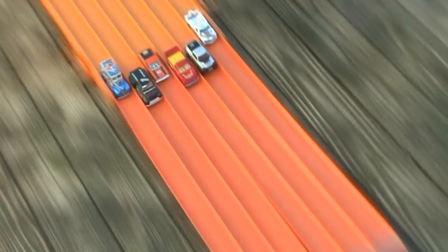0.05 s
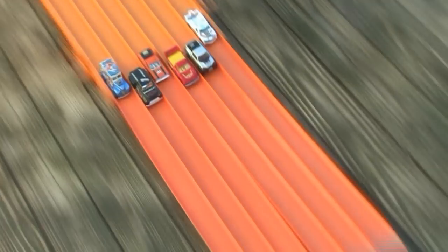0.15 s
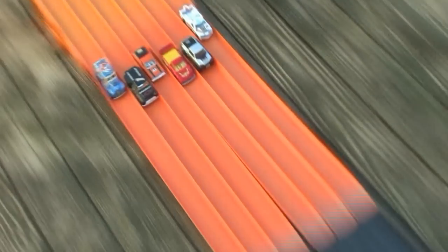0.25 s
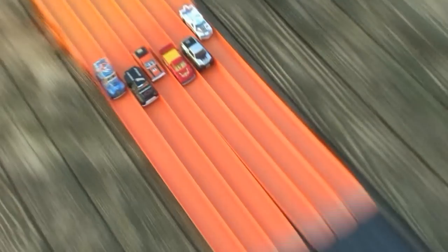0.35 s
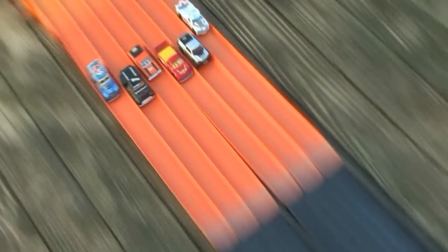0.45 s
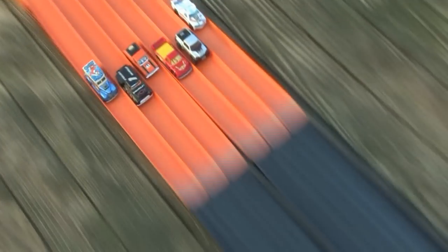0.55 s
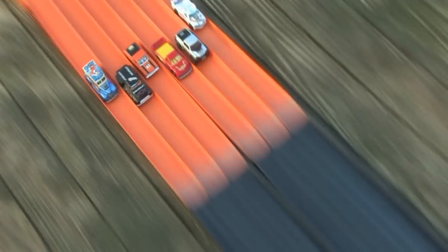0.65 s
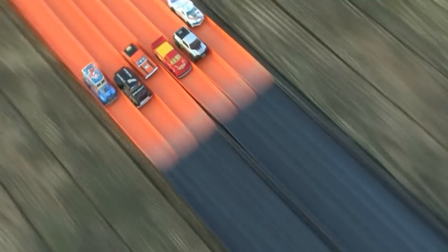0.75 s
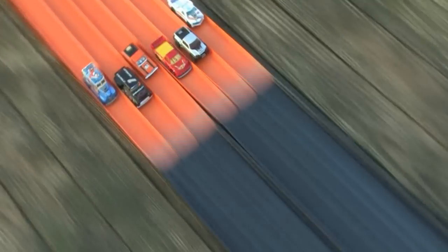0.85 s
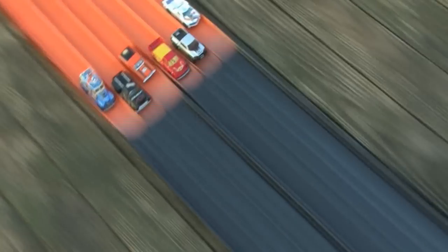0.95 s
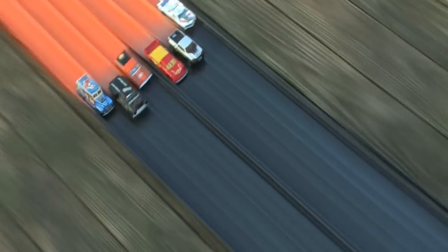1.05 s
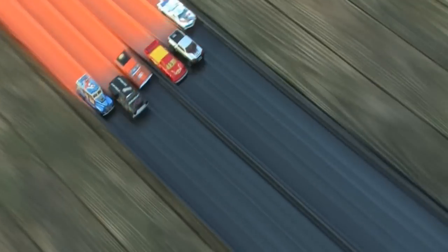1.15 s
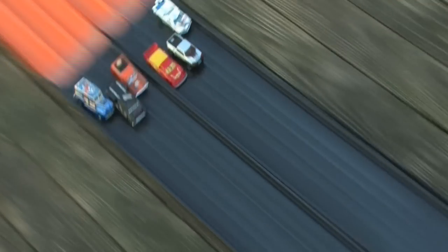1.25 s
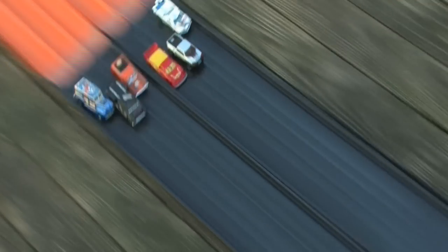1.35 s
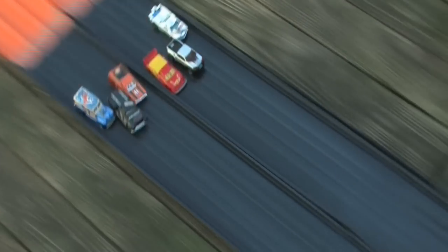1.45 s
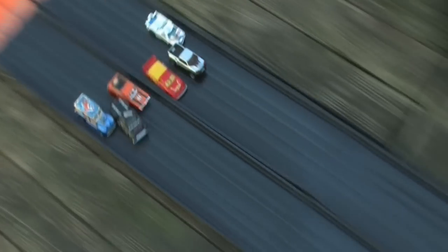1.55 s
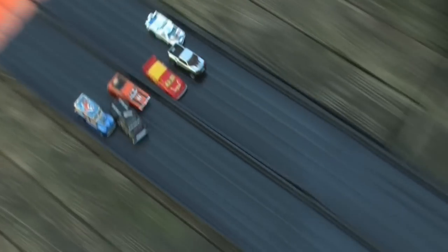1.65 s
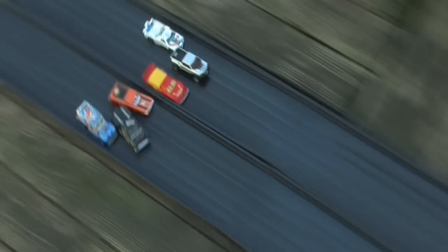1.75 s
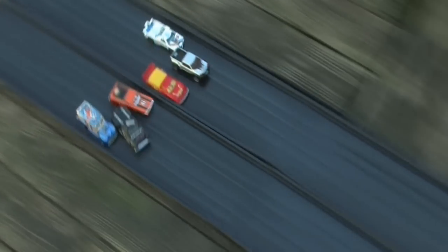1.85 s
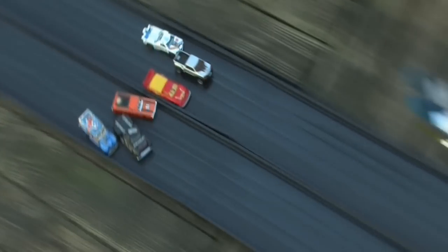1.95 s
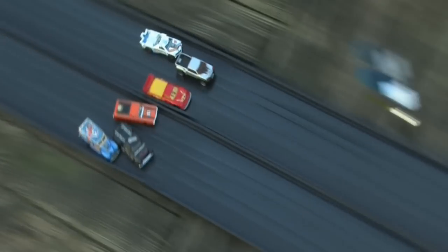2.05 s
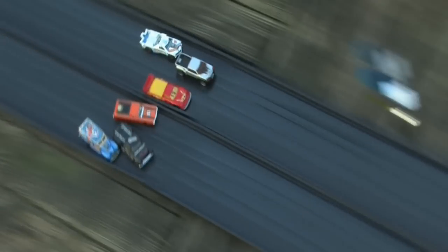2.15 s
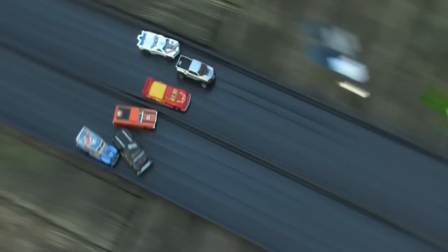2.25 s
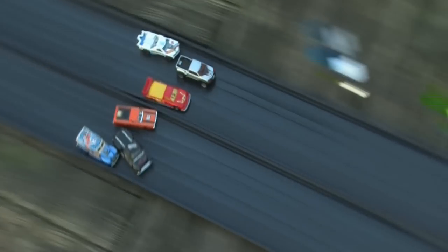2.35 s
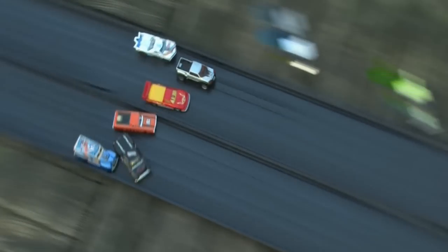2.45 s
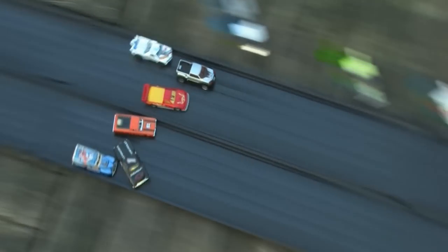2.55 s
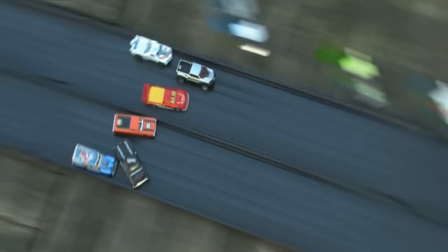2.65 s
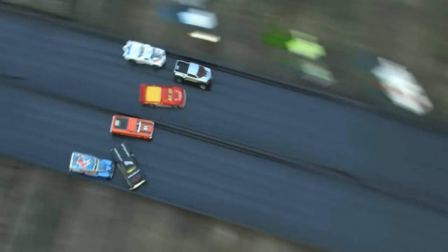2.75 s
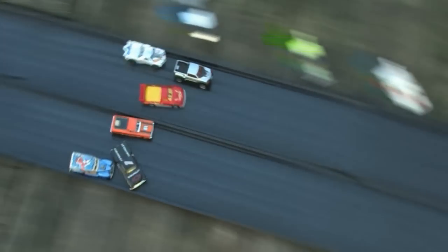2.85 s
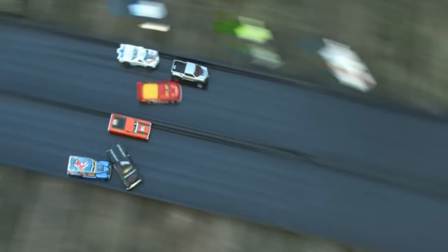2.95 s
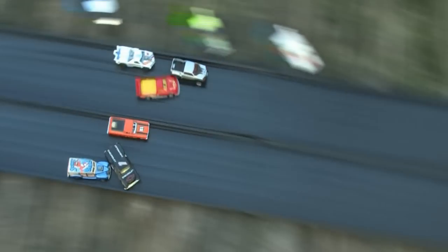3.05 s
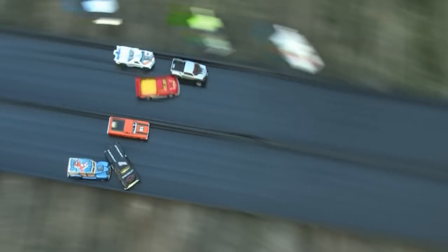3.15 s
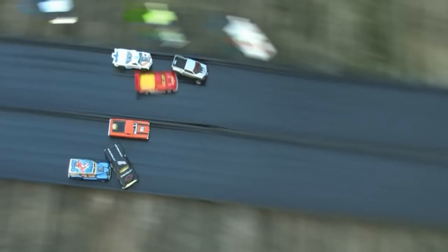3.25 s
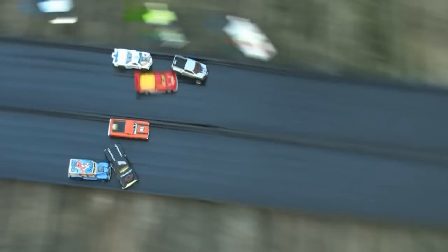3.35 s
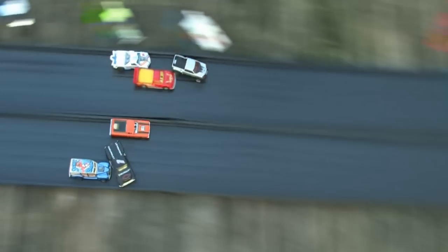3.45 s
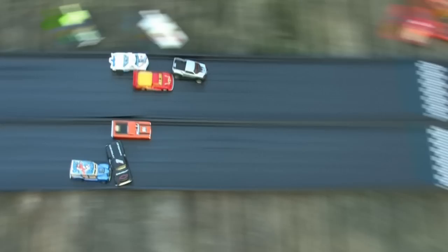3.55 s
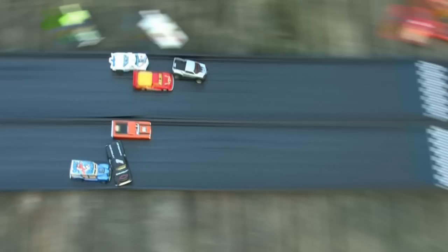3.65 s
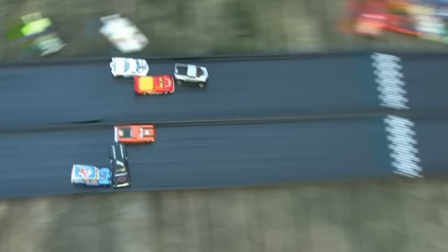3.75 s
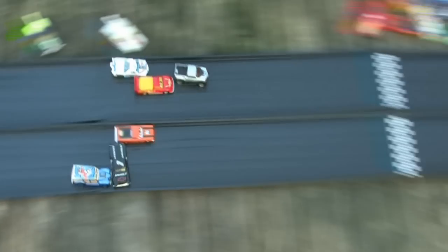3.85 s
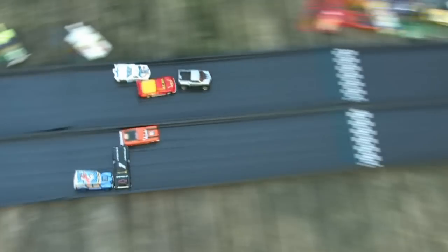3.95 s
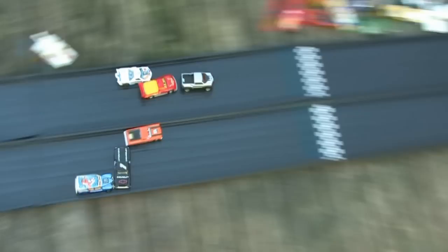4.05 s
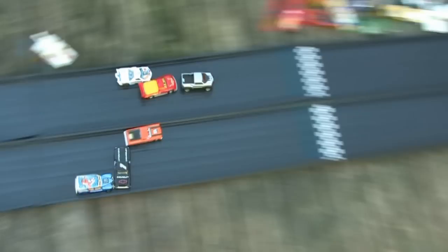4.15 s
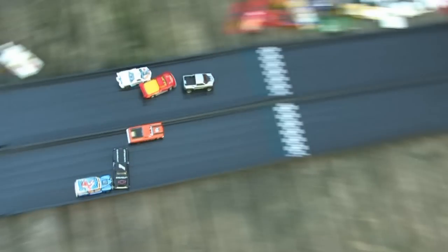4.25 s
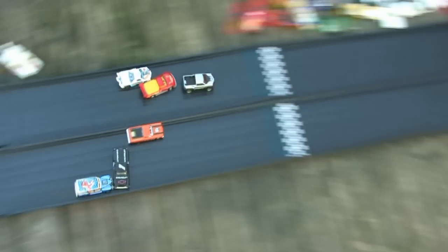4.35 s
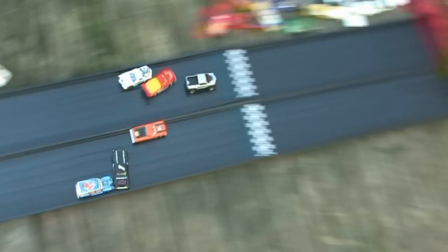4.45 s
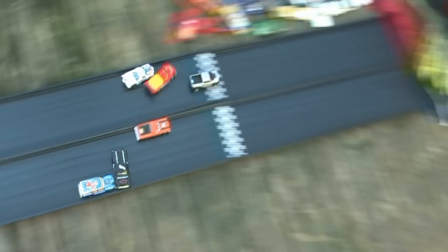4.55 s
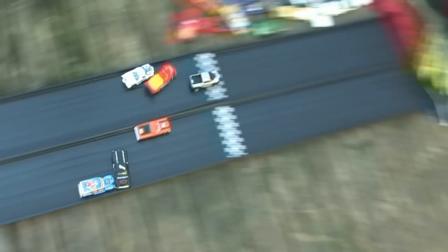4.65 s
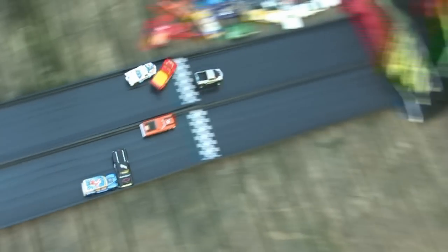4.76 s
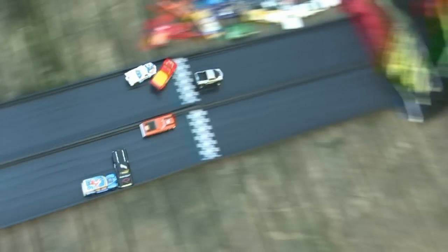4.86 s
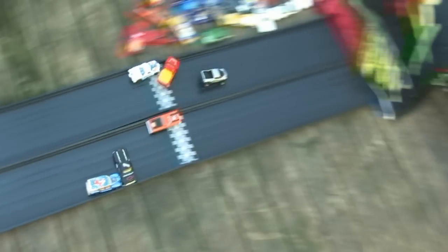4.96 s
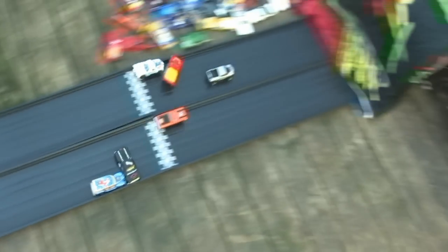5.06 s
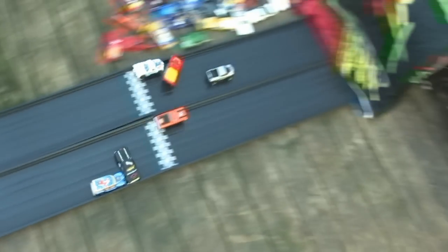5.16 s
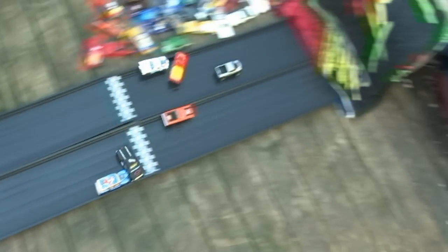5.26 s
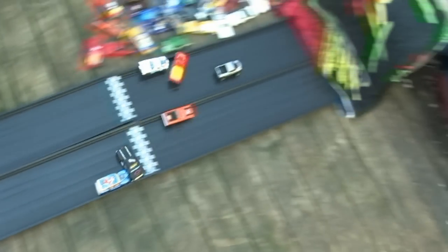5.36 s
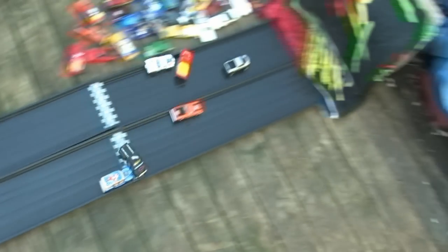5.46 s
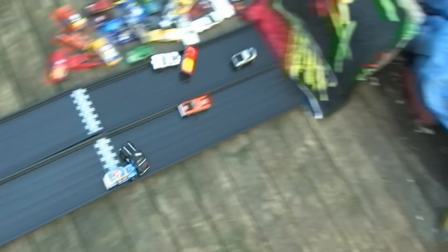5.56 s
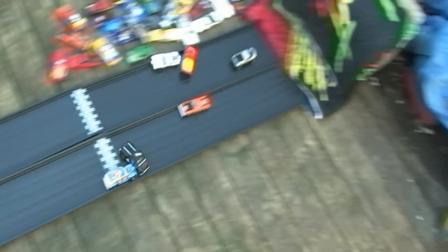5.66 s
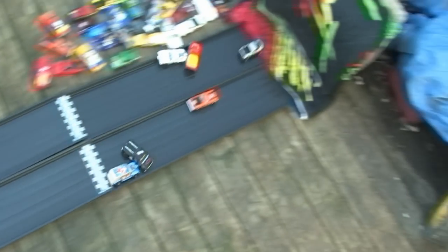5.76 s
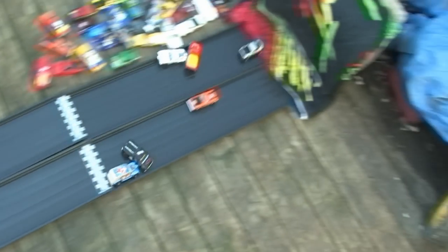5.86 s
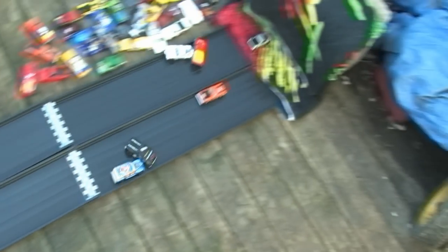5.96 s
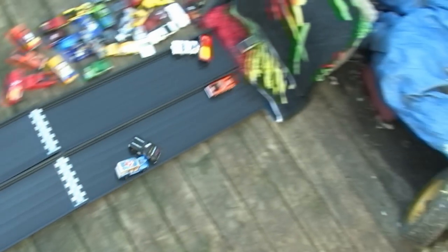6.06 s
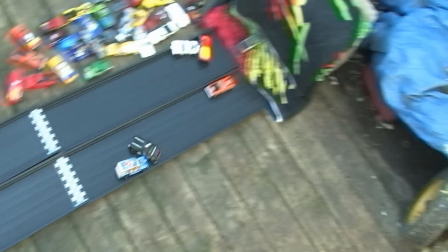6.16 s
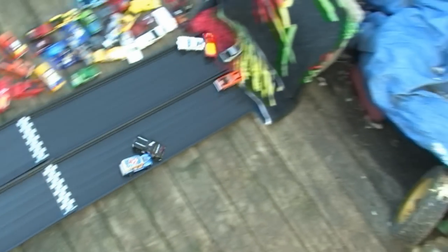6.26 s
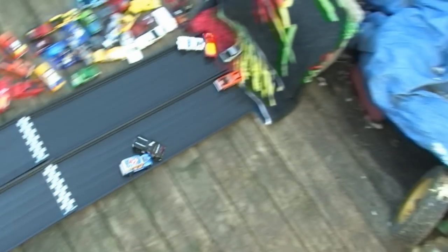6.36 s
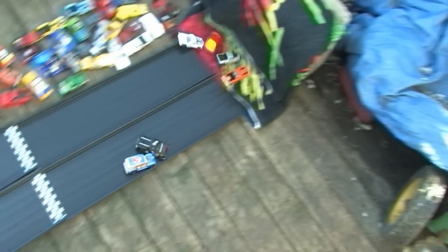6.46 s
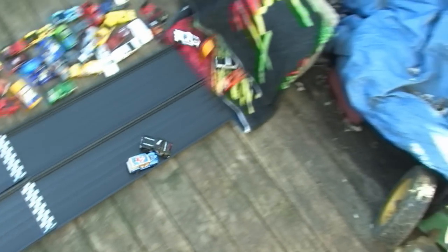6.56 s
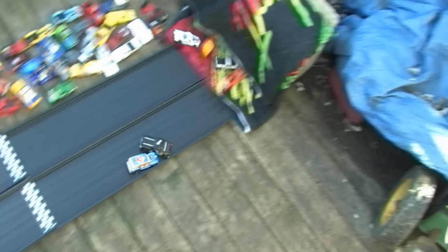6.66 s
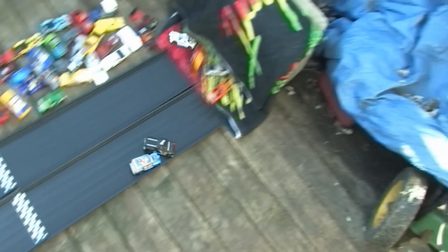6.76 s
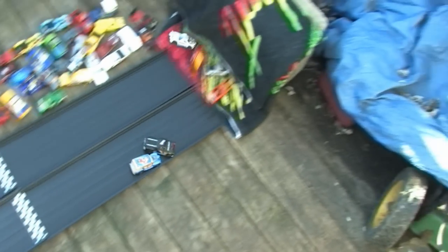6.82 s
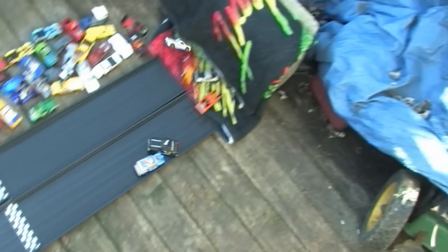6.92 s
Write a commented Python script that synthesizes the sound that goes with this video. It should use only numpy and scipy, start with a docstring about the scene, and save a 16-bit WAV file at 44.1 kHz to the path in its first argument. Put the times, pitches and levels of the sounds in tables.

```python
"""A drumming, rattling rush of small die-cast toy cars on a plastic track, close up in slow motion.
The cars clack, thump and ring as they hop over a joint, jostle and drop into a catch bag.
Random wheel bumps pass through resonances of the track and the cars to make the rolling;
short random pushes make the clacks and thumps, and fading sine notes the rings and ticks.
Below lies a rumble of shaped noise; slow playback adds a faint mirrored fizz in the treble."""
import sys
import numpy as np
from scipy import signal
from scipy.fft import rfft, irfft
from scipy.io import wavfile
from scipy.ndimage import uniform_filter1d, minimum_filter1d, map_coordinates

SR = 44100
rng = np.random.default_rng(int(sys.argv[2]) if len(sys.argv) > 2 else 0)


def waveform_to_disk(signal):
    """Save audio, clipped to [-1, 1], as 16-bit WAV at the path in sys.argv[1]."""
    frames = np.transpose(np.atleast_2d(signal))
    scaled = np.clip(frames, -1, 1) * 32767
    samples = np.round(scaled).astype(np.int16)
    wavfile.write(sys.argv[1], SR, samples)


N = 308259
TIME = np.arange(N) / SR  # seconds
BINS = np.fft.rfftfreq(N, 1 / SR)  # Hz

# Levels in the tables are relative: the functions below scale them further.
# Low stir of the open air. Each row: frequency in Hz, strength in dB.
AIR = [(5, -20), (22, -1.5), (45, -3), (80, -8), (130, -45), (300, 6.5), (1000, -53), (4000, -64.5)]
# Soft puffs in the air. Each row: time in seconds, extra level in dB.
PUFFS = [(1.36, 15), (5.45, 7.7), (6.33, 10)]
BREEZE_DB, PUFF_S = -43, 0.025

# Resonances of the parts. Each row: frequency in Hz, width in Hz, strength in dB.
SHEET = [(209.6, 63.7, 0.5), (284.5, 28, -3.5)]
DECK = [(317, 40, -9.5), (412, 290, 1.5), (478.5, 96, 1.5)]
RAILS = [(673, 144, 2), (770, 142, 5.9), (862, 101, 7.5), (934.5, 117, 3.8)]
CARS = [(835, 190, -10.5), (980, 130, -15.5), (1214, 645, -0.5), (1340, 107, 6.5), (1475, 190, 3),
        (1722, 120, 1.5), (1820, 120, 0.5)]
# Axles in their slots, with the same columns: frequency in Hz, width in Hz, strength in dB.
AXLES = [(2197, 380, 0.5), (2200, 250, -4.5), (2592, 270, 1.5), (2898, 180, -1.5), (3490, 152, -5),
         (3950, 210, -13.5)]
# A body buzzing on its chassis, with the same columns: frequency in Hz, width in Hz, strength in dB.
BUZZ = [(1587, 87, 0.5), (1640, 110, -2.5)]

# Loose lengths of track that drone hollowly. Each row: start in seconds, end in seconds,
# first pitch in Hz, last pitch in Hz, width in Hz, level in dB.
SPANS = [(0.578, 1.133, 366, 467, 176, -23.5), (1.2, 2.01, 417, 408, 68.5, -27),
         (1.53, 1.807, 255, 218, 70, -24.5), (1.95, 2.384, 262, 357, 111, -26),
         (2.265, 2.404, 416, 390, 51, -26), (2.852, 3.724, 502, 469, 56, -28),
         (2.846, 3.598, 196, 262, 54.4, -26), (3.895, 4.363, 445, 370, 70, -27),
         (4.202, 4.537, 213, 190, 39.6, -27.5), (4.577, 5.2, 412, 390, 45.6, -28.5)]
SPAN_FADE_S = 0.12

# How hard the pack rolls; it thins out as cars stall or drop into the bag.
# Each row: time in seconds, level in dB.
ROLL = [(0, -19.5), (.07, -17), (.7, -21.5), (1.7, -20.5), (2.38, -19.5), (2.6, -21), (2.9, -20),
        (4.7, -21), (5.68, -21.5), (5.82, -24.5), (6.5, -24), (6.66, -28), (6.99, -34.5)]
# How freely the track sheet flexes under the cars. Each row: time in seconds, level in dB.
FLEX = [(0, -37), (.35, -27), (1.12, -47), (1.28, -24.5), (1.48, -41), (1.58, -29.5), (2.35, -28.5),
        (3.15, -25), (3.6, -26.5), (4.0, -27), (4.4, -26.5), (5.1, -27.5), (5.65, -24), (5.85, -32),
        (6.4, -32.5), (6.99, -36)]
# Harder rattling, from rough track or rubbing cars. Each row: start in seconds, end in seconds,
# extra level in dB.
RATTLES = [(0, 0.31, 9.5), (1.096, 1.41, 1), (2.274, 2.42, 2.5), (4.824, 4.912, 4), (6.885, 6.99, 1.5)]
RATTLE_UNDER_DB, RATTLE_RISE_S, RATTLE_FALL_S = -12, 0.13, 0.19
# Brief level changes, mostly lulls as the wheels run smoothly or leave the track.
# Each row: time in seconds, change of the rolling in dB, change of the rattle in dB.
LULLS = [(0.121, -1.5, -8.5), (.158, 4, -4.5), (3.02, -0.5, -1), (.54, -2, -3.5), (1.485, -6.5, 1),
         (1.94, -3.5, -1), (2.215, -7.5, 3.5), (2.6, -7, 0), (3.943, -6.5, -5), (4.979, -2.5, -5),
         (5.24, -6.5, -3.5), (5.348, -8, -8), (5.44, -8.5, 1.5), (5.79, 1.5, -7.5)]
LULL_S = 0.022
# The load on the wheels surges at random: rough top speed, then typical (rms) depths.
SURGE_HZ, FLEX_SURGE_DB, ROLL_SURGE_DB, RATTLE_SURGE_DB = 10.9, 4.5, 1.5, 2.5
# The track's resonances wander as the cars move: typical depth as a share of the pitch, and speed.
SHEET_DRIFT, DECK_DRIFT, DRIFT_HZ = 0.05, 0.04, 4.97
AXLE_FADE_DB_PER_S = 0.5  # the axles tick less as the cars lose speed
CLUMP_HZ, CLUMP_DB = 22.06, 5  # the ticks bunch and thin out: speed, typical depth

# Cars dropping back on their wheels. Each row: time in seconds, level in dB,
# settling time in seconds, dead thud over the boom in dB.
THUMPS = [(1.324, -11.5, 0.013, -6), (1.519, -11, 0.0062, -20), (1.575, -21, .012, -9),
          (1.745, -17, 0.0082, -9), (1.98, -12.5, 0.011, -14), (2.05, -18, 0.019, -14),
          (3.209, -18, 0.007, -5), (3.232, -12.5, 0.0072, -22), (3.315, -11, 0.0059, -3),
          (3.689, -15.5, 0.0028, -18), (4.517, -14.5, 0.0055, -5), (5.158, -13.5, 0.009, -22),
          (5.177, -15.5, 0.0057, -21), (5.292, -12, 0.002, 1.5), (5.477, -14, 0.0072, -13),
          (5.588, -15.5, 0.0049, -19), (5.622, -13, 0.012, -13), (5.848, -19.5, 0.0092, -8),
          (6.493, -21, 0.0076, -13), (6.512, -21.5, 0.011, -18)]
# Knocks that leave one car ringing on a clear note. Each row: time in seconds, pitch in Hz,
# level in dB, time to fall by 60 dB in seconds.
RINGS = [(0.086, 1495, -14, 0.089), (1.312, 1387, -3, 0.045), (1.313, 1817, -1, 0.045),
         (1.315, 2590, -22, 0.039), (1.314, 3970, -12, 0.016), (1.387, 2450, -24, 0.034),
         (1.317, 787, -8, 0.047), (2.157, 1780, -18.5, 0.056), (2.494, 1470, -9.5, 0.041),
         (2.729, 1510, -15, 0.053), (2.798, 1300, -16, 0.052), (3.685, 930, -7.5, 0.078),
         (3.969, 876, -6, 0.042), (4.161, 1826, -26, .06), (4.345, 1820, -22.5, 0.083),
         (4.862, 868, -8.5, 0.12), (4.921, 1335, -22, 0.092), (5.377, 1350, -11.5, 0.049),
         (5.379, 1210, -15, 0.052), (5.381, 770, -14, 0.045), (5.394, 1800, -18, 0.041),
         (6.571, 855, -4, 0.043), (6.576, 2500, -23, 0.026), (6.577, 524, -9.5, 0.05),
         (6.585, 818, -1, 0.03), (6.596, 1885, -15, 0.04), (6.612, 1410, -12, 0.024),
         (6.755, 1453, -17, 0.044), (6.758, 770, -10, 0.03), (6.754, 1740, -19, 0.045)]
# Cars striking joints, walls and each other. Each row: time in seconds, level in dB,
# contact length in seconds, bright crack over the body in dB, knock of the deck over the body in dB.
CLACKS = [(0.047, -29, 0.0024, -2, 2), (0.075, -18.5, 0.0024, -29, -2), (0.226, -20, 0.0037, -26, 7),
          (0.271, -15, 0.0041, -21, -5), (0.298, -23, 0.0062, -22, -2), (1.224, -31.5, 0.016, -16, 4),
          (1.312, -15.5, 0.0061, -4, 2.5), (1.383, -29.5, 0.0063, -7, 10), (2.159, -34, 0.0013, -2, 16),
          (2.492, -22.5, 0.0033, -7, -11), (2.56, -29.5, 0.0025, -5.5, -7), (2.734, -26, 0.0025, -11.5, -9),
          (2.796, -31.5, 0.0024, -5, -4), (3.313, -33, 0.0078, -6, 6), (3.603, -32, 0.015, -7, 4.5),
          (3.682, -24.5, 0.008, -7, -7), (3.746, -39, 0.0026, 7, -13), (5.161, -28.5, 0.021, -10, -10),
          (5.204, -28, 0.0027, -17, 7), (5.377, -20, 0.0014, -11, -15), (5.394, -29, 0.0017, -12, -8),
          (5.421, -31, .004, -21, -3), (5.503, -32.5, 0.0032, 1, 7), (5.585, -28.5, 0.0049, -7, 3.5),
          (5.614, -30.5, 0.017, -13, -0.5), (5.69, -31.5, 0.0033, -13, 16), (6.122, -34.5, 0.013, -9, -1),
          (6.493, -25, 0.005, -15, 7.5), (6.575, -23, 0.014, -5.5, -3.5), (6.612, -31, 0.002, -7, -4),
          (6.699, -34.5, 0.0071, -25, -8), (6.752, -27, 0.0022, -5.5, -1), (6.762, -26, .0015, -12, -2.5)]
# Short extra clacks. Each row: time in seconds, level in dB.
NUDGES = [(0.256, -32), (1.562, -38), (2.06, -29.5), (2.144, -40), (4.552, -31.5), (5.292, -32.5),
          (5.368, -35), (5.931, -34.5)]
NUDGE_S, NUDGE_CRACK_DB = 0.0016, -5
CAR_SPREAD = 0.04  # largest shift of a car's pitch, as a share

# How alike left and right are. Each row: frequency in Hz, likeness from 0 to 1.
SAME = [(50, .93), (180, .98), (350, .96), (700, .89), (1400, .8), (2800, .72)]
# How much louder left is than right. Each row: frequency in Hz, difference in dB.
BALANCE = [(50, 1.1), (350, 3.57), (700, 1.5), (1400, 1.2), (2800, 0.46)]
# Slow playback: samples a second, top of the slowed sound, top of its mirrored fizz.
SLOW_RATE, SLOW_TOP_HZ, EDGE_HZ = 9600, 4120, 13900
# Thin ticks laid over the slow playback. Each row: time in seconds, level in dB.
SKIPS = [(0.499, -25), (2.499, -25), (3.499, -25), (6.499, -21)]
SKIP_DECAY_S = 0.0001


def gain_of(db):
    """Turns decibels into a gain."""
    return 10 ** (np.asarray(db) / 20)


def evened(x):
    """Scales x to an average strength (rms) of one."""
    return x / np.sqrt(np.mean(x ** 2) + 1e-20)


def steadied(x, size):
    """Holds the power of x near one over spans of size samples."""
    return x / np.sqrt(abs(uniform_filter1d(x ** 2, size, axis=1)) + 1e-9)


def read(points, hz):
    """Reads a table along a logarithmic frequency axis."""
    f, value = np.transpose(points)
    return np.interp(np.log(hz + 1), np.log(f + 1), value)


def add(mix, s, sound):
    """Adds a two-channel sound to the mix at time s."""
    part = mix[:, max(round(s * SR), 0):][:, :sound.shape[1]]
    part += sound[:, :part.shape[1]]


def wander(hz):
    """Makes a random curve of rms one that moves mostly slower than hz."""
    smooth = rfft(rng.standard_normal(N)) / (1 + (BINS / hz) ** 4)
    return evened(irfft(smooth, N))


def swells(rows, width_s):
    """Makes smooth rises or dips in dB, one around each time."""
    return sum(db * np.exp(-((TIME - s) / width_s) ** 2) for s, db in rows)


def ring(x, modes, pitch=1):
    """Passes x through steep-sided resonances whose powers add; pitch scales them all."""
    hz = np.fft.rfftfreq(4096, 1 / SR) / pitch
    power = sum(gain_of(2 * db) / (1 + ((hz - centre) / (width / 2)) ** 2) ** 2
                for centre, width, db in modes)
    cepstrum = irfft(np.log(power) / 2)
    # minimum phase: nothing sounds before the push that causes it
    causal = cepstrum * (1 + np.sign(np.fft.fftfreq(len(cepstrum))))
    response = irfft(np.exp(rfft(causal)))
    return signal.oaconvolve(x, response[None], axes=1)[:, :x.shape[1]]


def note(hz, t60, rise_s):
    """One dying mode of vibration: a sine with a soft start that falls 60 dB in t60 seconds."""
    t = np.arange(SR // 5) / SR
    rise = 1 - np.exp(-t / rise_s)
    return rise * gain_of(-60 * t / t60) * np.sin(2 * np.pi * hz * t)


def radiated(x, low_hz):
    """A thin plastic sheet is too light and small to send out deep bass."""
    return signal.sosfilt(signal.butter(3, low_hz, "highpass", fs=SR, output="sos"), x)


def drifting(x, depth):
    """Lets the pitch of x wander up and down by reading it at an uneven speed."""
    place = np.arange(N) + depth * np.cumsum(wander(DRIFT_HZ))
    return np.array([np.interp(place % N, np.arange(N), side) for side in x])


def wheels(bumps_per_s, spread_db, smooth):
    """Tiny bumps of uneven size under the wheels, over an even rubbing."""
    size = gain_of(spread_db * np.minimum(rng.exponential(1, N), 3))
    size = size * (rng.random(N) < bumps_per_s / SR)
    bumps = evened(size * rng.choice([-1., 1.], (2, N)))
    return bumps + smooth * rng.standard_normal((2, N))


def rattling():
    """Rattle level in dB: the bodies follow the rolling, and shake harder on rough stretches."""
    extra = 0
    for start, end, db in RATTLES:
        rise = 1 + (TIME - start) / RATTLE_RISE_S
        fall = 1 - (TIME - end) / RATTLE_FALL_S
        extra = extra + db * np.clip(np.minimum(rise, fall), 0, 1)
    return np.interp(TIME, *np.transpose(ROLL)) + RATTLE_UNDER_DB + extra


def shaking():
    """Flexing, rolling and rattling levels in dB: each surges by itself around the brief changes."""
    lull_db = swells([(s, db) for s, db, _ in LULLS], LULL_S)
    hush_db = swells([(s, db) for s, _, db in LULLS], LULL_S)
    flex_db = np.interp(TIME, *np.transpose(FLEX)) + lull_db + FLEX_SURGE_DB * wander(SURGE_HZ)
    roll_db = np.interp(TIME, *np.transpose(ROLL)) + lull_db + ROLL_SURGE_DB * wander(SURGE_HZ)
    rattle_db = rattling() + hush_db + RATTLE_SURGE_DB * wander(SURGE_HZ)
    return flex_db, roll_db, rattle_db


def air(level_db, gust_db):
    """The stirring air is a faint, uneven low rumble: shaped noise with a few soft puffs."""
    noise = irfft(rfft(rng.standard_normal((2, N))) * gain_of(read(AIR, BINS)), N)
    breeze_db = BREEZE_DB + swells(PUFFS, PUFF_S)
    return gain_of(breeze_db + level_db + gust_db * wander(hz=0.73)) * evened(noise)


def droning():
    """Wheel bumps ring each loose length of track at a pitch that shifts as the cars cross it."""
    out = np.zeros((2, N))
    bumps = wheels(bumps_per_s=300, spread_db=-1.5, smooth=0.9)
    for start, end, first_hz, last_hz, width_hz, db in SPANS:
        crossing = np.clip(1 + np.minimum(TIME - start, end - TIME) / SPAN_FADE_S, 0, 1)
        on = crossing > 0
        hz = np.interp(TIME[on], [start, end], [first_hz, last_hz])
        turn = np.exp(2j * np.pi * np.cumsum(hz) / SR)
        # shift the moving pitch down to zero, keep a narrow band, and shift it back
        narrow = signal.butter(2, width_hz / 2, fs=SR, output="sos")
        drone = (turn * signal.sosfilt(narrow, bumps[:, on] / turn)).real
        out[:, on] += gain_of(db) * crossing[on] * steadied(drone, size=3000)
    return out


def jiggling(level_db, ticks_per_s, spread_db, t60, rise_s, fall_db, low_hz, high_hz):
    """Loose wheels and shells tick in clumps; each tick rings briefly at one of many pitches."""
    out, clumps = np.zeros((2, N)), gain_of(CLUMP_DB * wander(CLUMP_HZ))
    pitches = np.geomspace(low_hz, high_hz, num=24)
    chance = ticks_per_s / SR / len(pitches) * clumps / clumps.mean()
    for hz in pitches:
        at = np.flatnonzero(rng.random(N) < chance)
        # higher ticks are weaker, by fall_db an octave
        tick = gain_of(-fall_db * np.log2(hz / low_hz)) * note(hz, t60, rise_s)
        for s, (force, place) in zip(TIME[at], rng.uniform(-1.08, 1, (len(at), 2))):
            add(out, s, np.outer([1, 2 * place], gain_of(spread_db * force) * tick))
    lull_db = swells([(s, db) for s, db, _ in LULLS], LULL_S)
    return evened(out) * gain_of(level_db + rattling() + lull_db)


def pings(rise_s):
    """Car shells ring on clear, dying notes after the hard knocks."""
    out = np.zeros((2, N))
    for s, hz, db, t60 in RINGS:
        sides = [1, rng.uniform(-.3, .3)]
        add(out, s, np.outer(sides, gain_of(db) * note(hz, t60, rise_s)))
    return out


def thumps(deck_db, thud_hz, thud_t60):
    """A landing car gives one dead thud, then settles on its wheels while sheet and deck boom."""
    out, t = np.zeros((2, N)), np.arange(SR // 5) / SR
    thud = evened(note(thud_hz, thud_t60, rise_s=.002))
    for s, db, settle_s, thud_db in THUMPS:
        push = np.exp(-t / settle_s) * rng.standard_normal((2, len(t)))
        boom = evened(ring(push, SHEET)) + gain_of(deck_db) * evened(ring(push, DECK))
        landing = radiated(boom + gain_of(thud_db) * thud, low_hz=141)
        add(out, s, gain_of(db - 15.5) * np.array([evened(side) for side in landing]))
    return out


def clacks(blow, rise_s, t60, chatter_t60, touches_per_s, tail_db, rails_db):
    """A first blow and a chatter of touches make a car, at its own pitch, and the track ring out."""
    out, t = np.zeros((2, N)), np.arange(SR // 6) / SR
    light = [(s, db, NUDGE_S, NUDGE_CRACK_DB, 0) for s, db in NUDGES]
    for s, db, length, crack_db, deck_db in CLACKS + light:
        after, rise = np.maximum(t - length, 0), 1 - np.exp(-t / rise_s)
        chatter = rise * gain_of(-60 * after / chatter_t60)
        tail = rise * gain_of(tail_db - 60 * after / t60)
        touched = rng.random(len(t)) < touches_per_s / SR
        touches = evened(rng.choice([-1., 1.], (2, len(t))) * touched)
        drive = chatter * touches + tail * rng.standard_normal((2, len(t))) + blow * (t == 0)
        snap = np.diff(drive, prepend=0)  # the crack follows the change of force, so it is brighter
        car = 1 + CAR_SPREAD * rng.uniform(-0.9, 1)
        parts = ((ring(drive, CARS, car), 0), (ring(snap, AXLES, car), crack_db),
                 (ring(drive, RAILS), rails_db), (ring(drive, DECK), deck_db))
        sound = np.zeros_like(drive)
        for part, part_db in parts:
            sound += gain_of(part_db) * part / np.linalg.norm(part, axis=1, keepdims=True)
        add(out, s, gain_of(db + 1.0) * np.linalg.norm(chatter + tail) * sound)
    return out


def rolling():
    """Wheel bumps shake the sheet, deck and side rails; loose bodies and axles rattle along."""
    flex_db, roll_db, rattle_db = shaking()
    coarse = radiated(wheels(bumps_per_s=170, spread_db=-0.5, smooth=0.72), low_hz=125)
    fine = wheels(bumps_per_s=280, spread_db=-1.0, smooth=1.0) * gain_of(0.35 * wander(hz=34.4))
    sheet = steadied(drifting(ring(coarse, SHEET), SHEET_DRIFT), size=3000) * gain_of(flex_db - 2)
    deck = steadied(drifting(ring(coarse, DECK), DECK_DRIFT), size=2400) * gain_of(roll_db - 2.5)
    # the rails are shaken both by the deck and by the cars that brush them
    rails_db = 0.5 * (roll_db + rattle_db) + 1.32
    rails = steadied(ring(fine, RAILS), size=3000) * gain_of(rails_db)
    bodies = steadied(ring(fine, CARS), size=3000) * gain_of(rattle_db - 1.5)
    # when shaken hard, the bodies buzz on their chassis; the two channels are swapped here
    buzz = steadied(ring(fine[::-1], BUZZ), size=3000) * gain_of(2 * rattle_db + 13.0)
    # axles tick in their slots, and grow more slowly than the rattle of the bodies
    axles_db = 0.64 * rattle_db - 23.0 - AXLE_FADE_DB_PER_S * TIME
    axles = steadied(ring(fine, AXLES), size=4000) * gain_of(axles_db)
    return sheet + deck + rails + bodies + buzz + axles


def scene():
    """Mixes what both microphones share (row one) and where they differ (row two) into left and right."""
    sound = rolling() + droning() + air(level_db=5.5, gust_db=0.5)
    sound += clacks(blow=4.2, rise_s=0.0012, t60=0.22, chatter_t60=0.027, touches_per_s=800,
                    tail_db=-11.0, rails_db=4.0)
    sound += pings(rise_s=0.00097)
    sound += jiggling(level_db=-5.0, ticks_per_s=480, spread_db=4.5, t60=0.044, rise_s=0.001,
                      fall_db=14.5, low_hz=1258, high_hz=3696)
    sound += thumps(deck_db=2.5, thud_hz=216, thud_t60=0.044)
    shared, apart = rfft(sound)
    same = np.clip(read(SAME, BINS), 0, 1)
    apart = apart * np.sqrt((1 - same) / (1 + same))
    lean = gain_of(read(BALANCE, BINS) / 2)
    return irfft(np.array([(shared + apart) * lean, (shared - apart) / lean]), N)


def record(dry):
    """Limits peaks, then plays slowly: straight lines between sparse samples mirror sound into the treble."""
    slow_band = signal.firwin(1201, SLOW_TOP_HZ, window=("kaiser", 8), fs=SR)
    sound = signal.oaconvolve(dry, slow_band[None], "same")
    ceiling = .5
    allowed = ceiling / np.maximum(abs(sound), ceiling)
    lowest = minimum_filter1d(allowed, size=41, axis=1)
    sound = sound * uniform_filter1d(lowest, size=41, axis=1)
    sparse = np.arange(0, TIME[-1], 1 / SLOW_RATE)
    slowed = np.array([np.interp(TIME, sparse, map_coordinates(side, [sparse * SR], order=3))
                       for side in sound])
    for s, db in SKIPS:
        tick = gain_of(db) * np.exp(-TIME[:SR // 100] / SKIP_DECAY_S)
        add(slowed, s, np.outer([1, 1], tick))
    edge = signal.firwin(255, EDGE_HZ, window=("kaiser", 9), fs=SR)
    return signal.oaconvolve(slowed, edge[None], "same")


dry = scene()
out = record(dry)
waveform_to_disk(out)
```